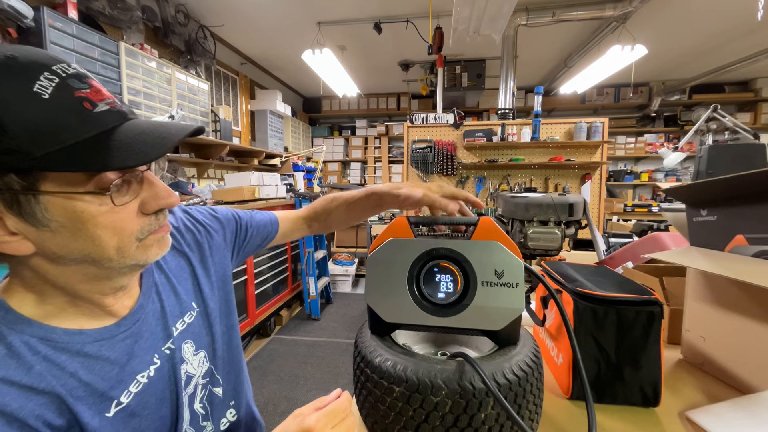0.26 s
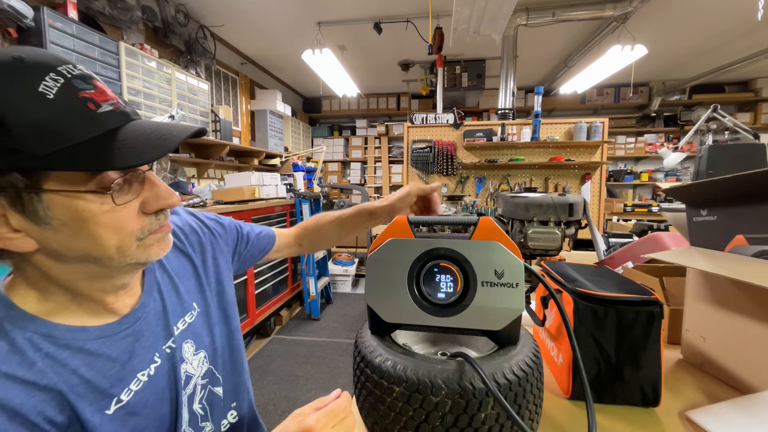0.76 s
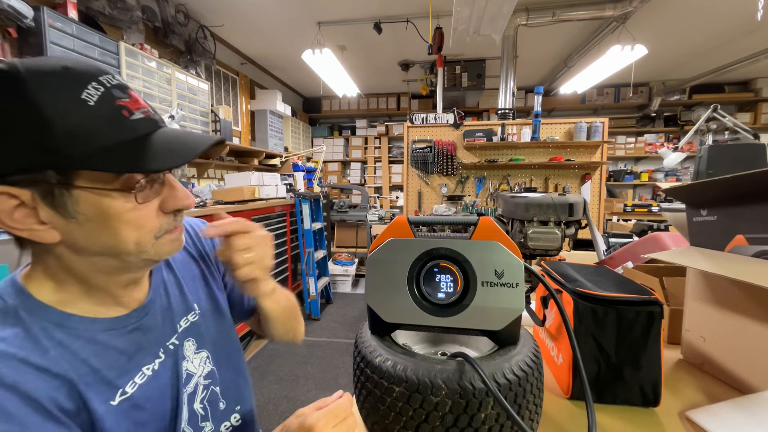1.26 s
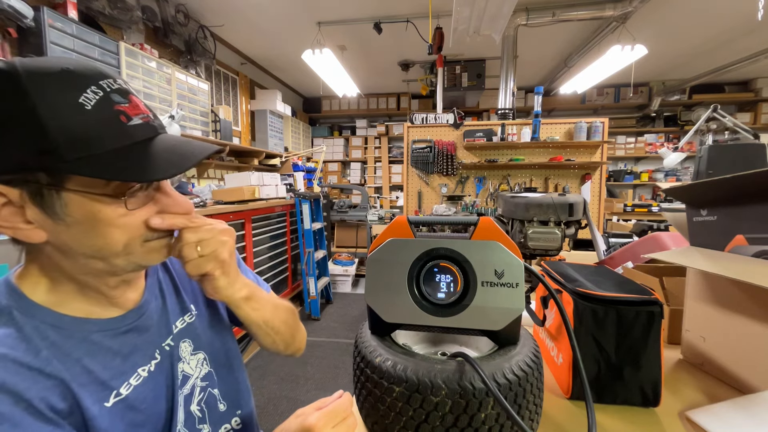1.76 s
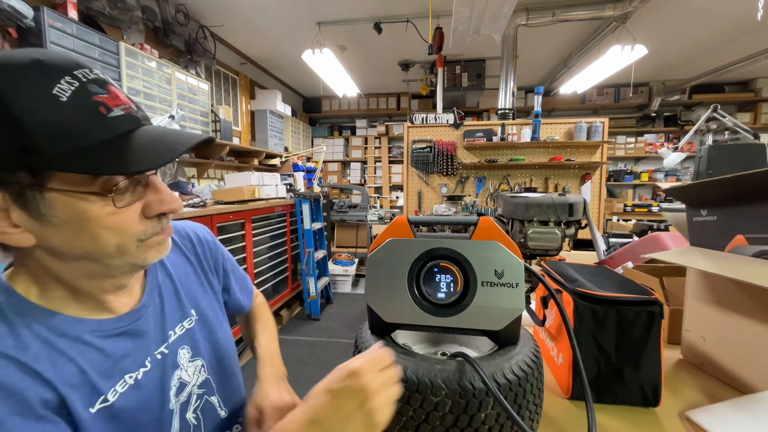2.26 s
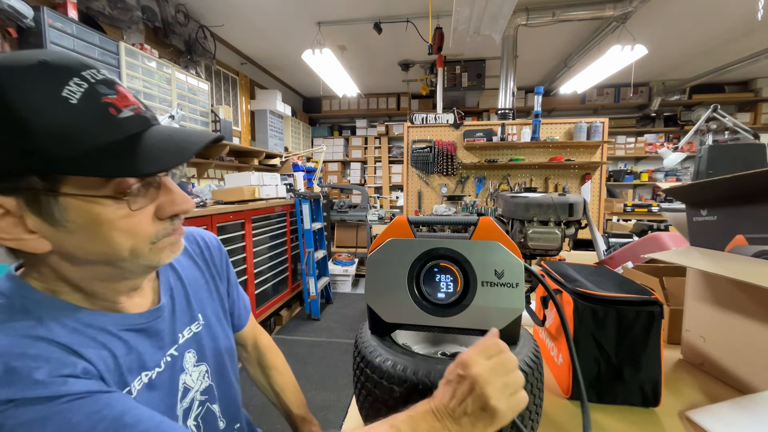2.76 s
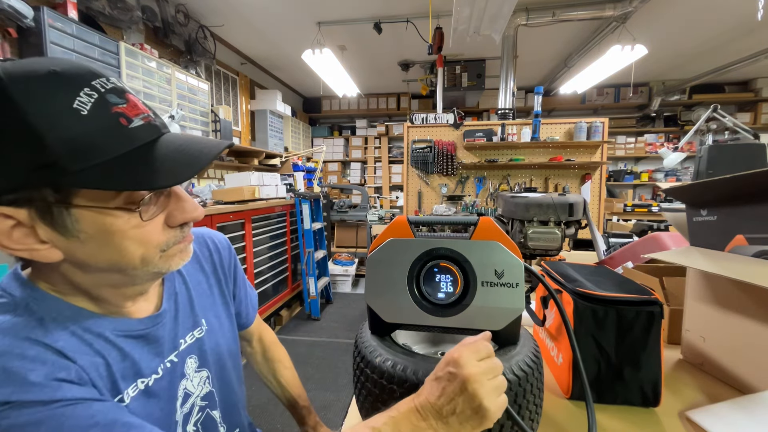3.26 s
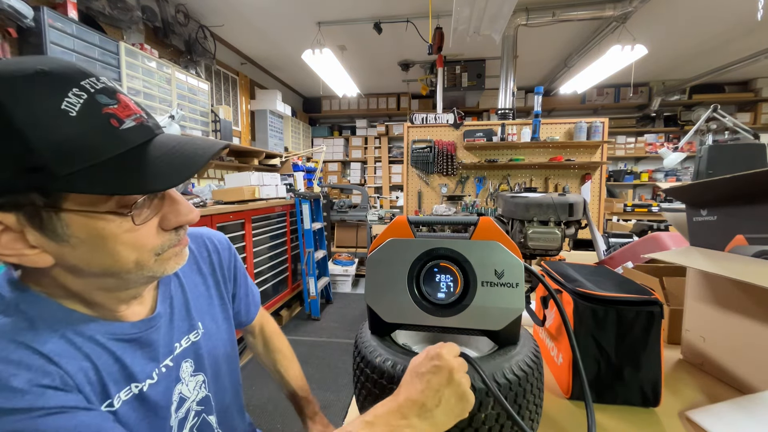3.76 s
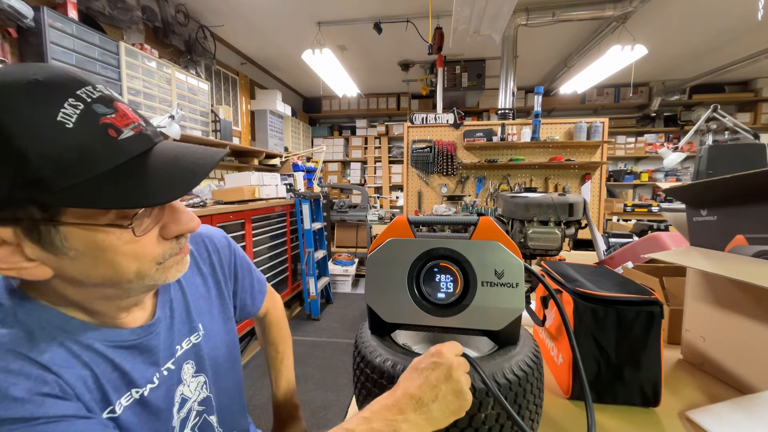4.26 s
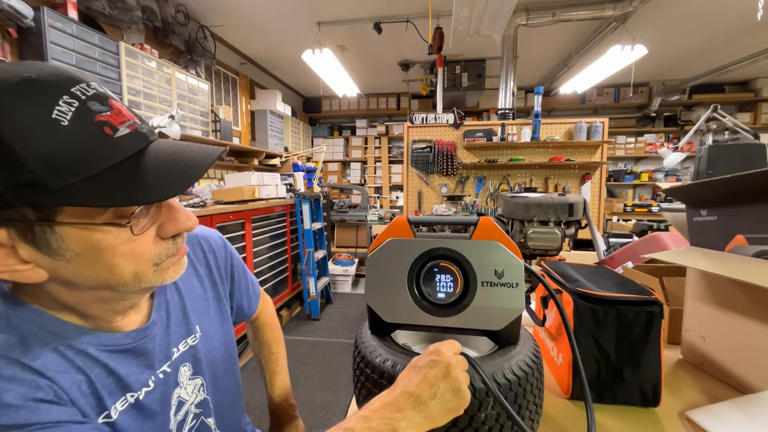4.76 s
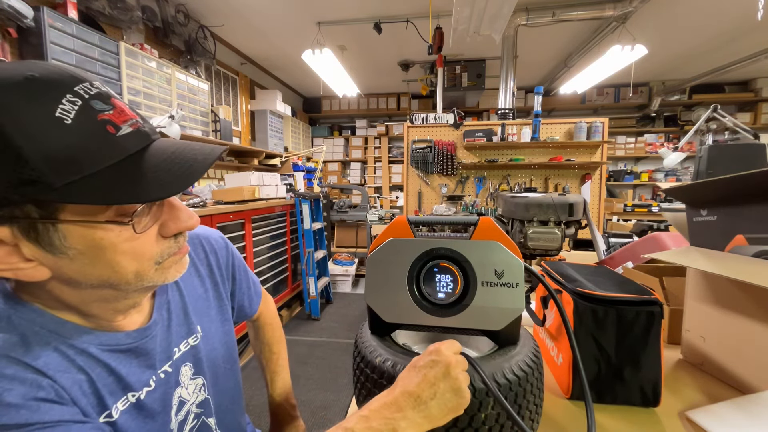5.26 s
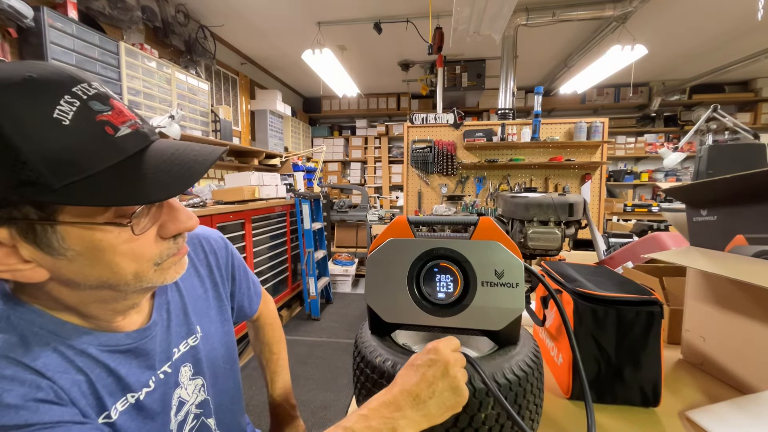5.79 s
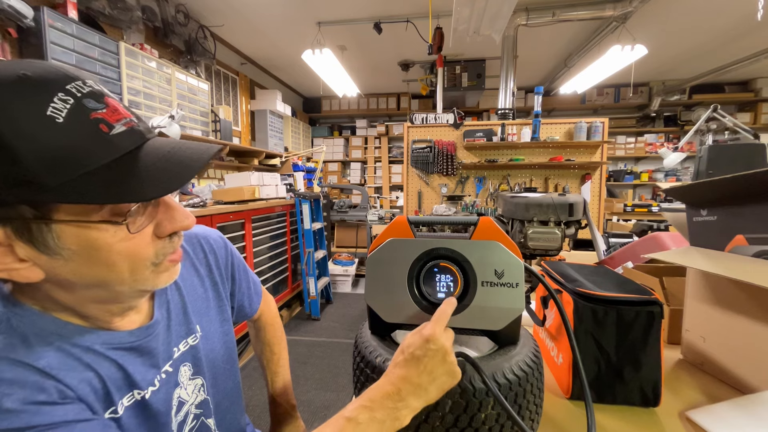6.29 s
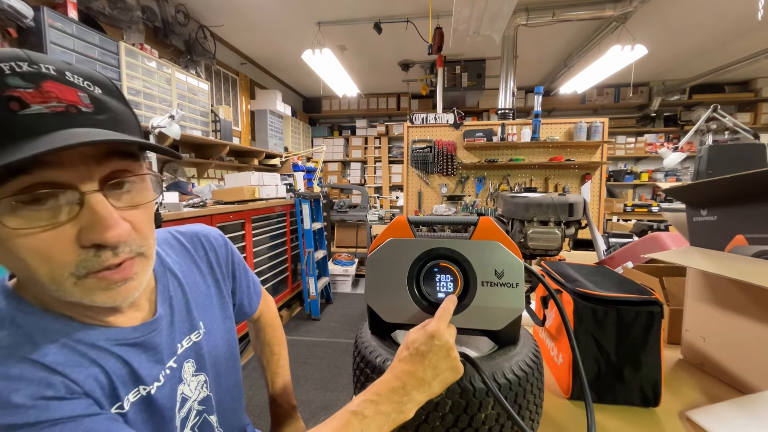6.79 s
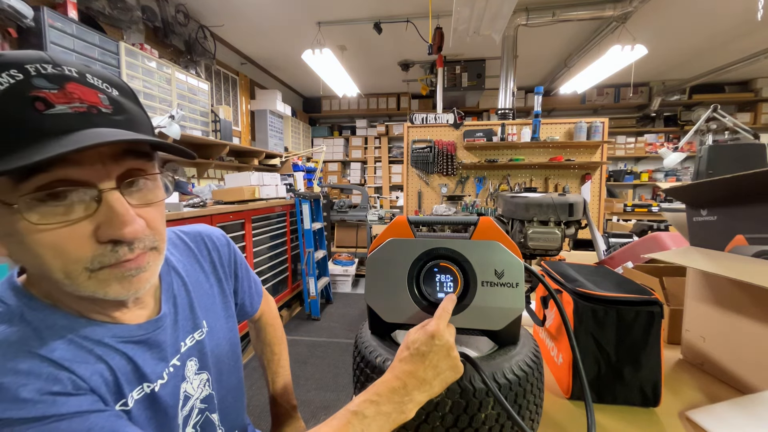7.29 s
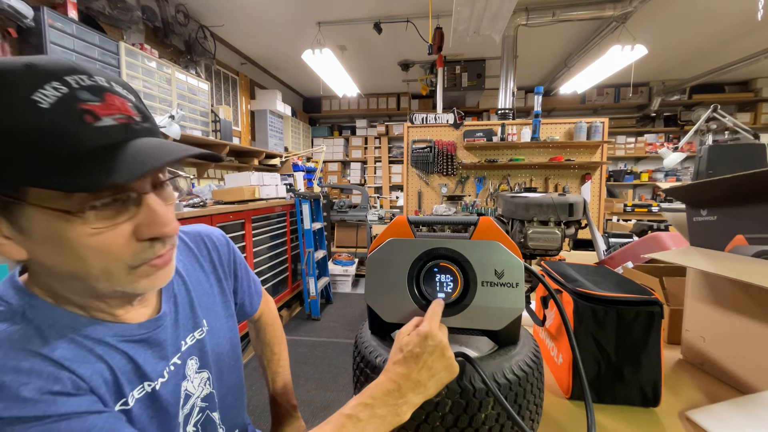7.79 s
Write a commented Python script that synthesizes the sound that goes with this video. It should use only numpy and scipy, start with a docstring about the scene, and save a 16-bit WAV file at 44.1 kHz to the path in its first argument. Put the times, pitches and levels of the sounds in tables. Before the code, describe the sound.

A cordless tire inflator is already running at the start and keeps going for about eight seconds, pumping up a tire on a workshop bench. Its piston gives a steady pitched hum with knocks so fast they blur into a buzz. Over this come a high gear whine, a rapid mechanical rattle, rushing air and a thin valve hiss. At first the pitch wavers very slightly and the gears rub with a light rasp, which eases at about 2.6 seconds. As pressure builds, the speed settles, the hum softens a little and the whine gains a tone an octave higher. The rasp returns at about 6.3 seconds, and the low hum dips for an instant at 7.7 seconds. Ceiling lights hum very faintly underneath. A single nearby microphone catches the pump with short reflections from the walls.

```python
"""A cordless tire inflator on a workshop bench, one microphone within earshot of pump and walls.
From the start its motor turns a crank through an 11-to-40 gear: the piston hums and knocks, the teeth
whine and rub, the rod rattles, air rushes and hisses through the valves twice a turn, and the lights
hum faintly. At 2.6 s the rubbing stops. As pressure builds, the speed settles, the hum softens and the
whine gains its octave. At 6.3 s the teeth rub again; at 7.7 s the low hum dips briefly."""
import sys
import numpy as np
from scipy import signal
from scipy.fft import rfft, irfft, next_fast_len
from scipy.io import wavfile
from scipy.ndimage import map_coordinates

SR = 44100
rng = np.random.default_rng(int(sys.argv[2]) if len(sys.argv) > 2 else 0)


def wav_out(sig):
    """Save sig, one row per channel (or a flat mono array), as 16-bit PCM at SR to the path in sys.argv[1]."""
    wavfile.write(sys.argv[1], SR, np.round(np.clip(np.atleast_2d(sig).T, -1, 1) * 32767).astype(np.int16))


N = 354563

# crank speed, hunting at first and then settling: time_s, speed_hz
CRANK_SPEED = [(0.06, 74.28), (0.3, 74.88), (0.42, 73.8), (0.66, 74.6), (0.9, 73.44), (1.47, 72.97),
               (1.68, 73.8), (2.13, 73.09), (2.22, 74.25), (2.46, 73.59), (3.15, 73.26), (3.24, 74.2),
               (3.3, 73.25), (4.86, 73.62), (5.01, 73.23), (5.07, 73.65), (7.8, 73.75), (7.98, 73.54)]
# piston tones: crank_multiple, level_db (relative)
PISTON_TONES = [(1, -38.5), (2, -11), (3, -29), (4, -1.53), (5, -5.5), (6, -20), (8, -12), (9, -9),
                (10, -10), (12, -1.9), (13, -8), (14, -9), (15, -12), (16, -18), (17, -21.5), (18, -10),
                (19, -8.5), (20, -16), (21, -14), (23, -36), (24, -17.5), (27, -25), (28, -17.5), (29, -28),
                (32, -29)]
# motor tones: motor_multiple, level_db
MOTOR_TONES = [(2, -59), (3, -30), (4, -40.5), (6, -42.5), (7, -46.5), (9, -65), (12, -44)]
# colour of the pumped air: frequency_hz, level_db (relative)
AIR_COLOUR = [(30, -55), (140, -27), (196, -29.5), (270, -10.5), (400, -11.5), (480, -24), (675, -4.5),
              (772, -9.5), (950, 0), (1160, -8), (1330, -4.5), (1480, -11), (1600, -5.5), (2300, -31)]
# tooth tone with the side tones of an uneven wheel: crank_multiple, level_db (relative)
TOOTH_TONES = [(38, -15), (39, -14.5), (40, 1), (41, -13), (45, -11), (47, -11.5)]
# tones around the tooth tone's octave: crank_multiple, level_db (relative)
OCTAVE_TONES = [(78, -22), (79, -5), (80, -10), (81, -16)]
# rise and fall of the gear whine: time_s, gain_db
WHINE_GAIN = [(0, -35.5), (.46, -34), (.65, -38), (.9, -29), (1.3, -32.5), (1.83, -31), (2.12, -36),
              (2.35, -28.5), (2.52, -34), (2.8, -32.5), (4.05, -34.5), (4.38, -30.5), (4.95, -32),
              (5.17, -29.5), (5.5, -31), (6.3, -30.5), (6.9, -36), (7.4, -32)]
# colour of the sliding teeth: frequency_hz, level_db (relative)
RASP_COLOUR = [(3200, -46), (3550, 5), (3760, 8.5), (4000, -5), (4500, -26)]
# spells in which the teeth rub: start_s, end_s
RUB_SPELLS = [(-.3, 2.6), (6.27, 8.3)]
# colour of the rattling rod and gears: frequency_hz, level_db (relative)
CLATTER_COLOUR = [(1000, -34), (1750, -3.5), (1950, -4.5), (2400, 3.5), (2620, -2.5), (2900, 0), (3150, -2),
                  (3550, -9), (4150, -8.5), (4600, -10.5), (6200, -14.5), (7300, -9), (8400, -14),
                  (9800, -18.5), (12000, -45)]
# colour of the valve hiss: frequency_hz, level_db (relative)
HISS_COLOUR = [(8500, -46), (10200, -18), (10620, -5), (10880, -4.5), (11300, -3), (12000, -1.5),
               (12450, 1.5), (12950, -13), (13550, -3), (14300, -3.5), (15100, -1.5), (15700, -9),
               (17000, -30)]
# narrow resonances of the housing and metal parts: pitch_hz, width_hz, lift_db
HOUSING_RINGS = [(1410, 120, 5), (3317, 48, 10), (3420, 40, 13), (4610, 75, 6.5), (4820, 110, 7.5),
                 (5090, 360, 3.5), (5894, 250, 7), (6580, 210, 4), (8440, 100, 7), (10940, 60, 6),
                 (11710, 69, 7.5), (14400, 120, 5)]
# reverberation of the workshop: frequency_hz, t60_s
SHOP_DECAY = [(200, 0.16), (2000, 0.35), (12000, 0.22)]

PINION_TEETH, WHEEL_TEETH, RATED_HZ = 11, 40, 73.6
FILL_S = 3.85  # time constant of the pressure rising in hose and tire
RECOVER_S = 0.77  # time constant with which the sound recovers after a rubbing spell


def amp(db):
    """Decibels to gain."""
    return 10 ** (np.asarray(db) / 20)


def unit(x):
    """Scale to rms 1."""
    return x / np.sqrt(np.mean(x ** 2) + 1e-20)


def along(points, hz):
    """Read (frequency_hz, value) points on a log axis."""
    frequencies, values = np.transpose(points)
    return np.interp(np.log(hz + 1), np.log(frequencies + 1), values)


def curve(points):
    """Join (time_s, value) points into one value per sample."""
    return np.interp(np.arange(N) / SR, *np.transpose(points))


def wobble(rate_hz):
    """A smooth random curve with rate_hz knots a second."""
    coarse = np.arange(0, N + 64, 64)
    knots = rng.standard_normal(4096)
    smooth = map_coordinates(knots, [coarse * rate_hz / SR], mode="wrap")
    return np.interp(np.arange(N), coarse, smooth)


def spell(start_s, end_s, fade_s):
    """1 from start to end and 0 outside, with soft edges."""
    t = np.arange(N) / SR
    return np.clip(np.minimum(t - start_s, end_s - t) / fade_s + .5, 0, 1)


def filtered(x, response):
    """Shape x by a gain that depends on frequency."""
    size = next_fast_len(N + SR // 2)
    return irfft(rfft(x, size) * response(np.fft.rfftfreq(size, 1 / SR)), size)[:N]


def housing(x, colour):
    """Give x a colour and the housing's resonances, at rms 1."""
    def lift_db(hz):
        return sum(db / (1 + (2 * (hz - pitch) / width) ** 2) for pitch, width, db in HOUSING_RINGS)
    return unit(filtered(x, lambda hz: amp(along(colour, hz) + lift_db(hz))))


def shop(x, wet_db):
    """The direct sound plus the room's diffuse answer, already built up around the running pump."""
    hz, t, spectrum = signal.stft(rng.standard_normal(SR // 3), SR, nperseg=256)
    decay = amp(-60 * t / along(SHOP_DECAY, hz)[:, None])
    tail = signal.istft(spectrum * decay, SR, nperseg=256)[1]
    return x + amp(wet_db) * irfft(rfft(x) * rfft(tail / np.linalg.norm(tail), N), N)


def tones(turns, partials, drift_db, flutter_rad):
    """Sines on whole multiples of a shaft's speed; higher ones drift and flutter more."""
    out = np.zeros(N)
    for order, db in partials:
        phase = 2 * np.pi * (order * turns + rng.random())
        phase += flutter_rad * np.sqrt(order) * wobble(30)
        out += amp(db + drift_db * np.sqrt(order) * wobble(1.84)) * np.sqrt(2) * np.sin(phase)
    return out


def drive_hum(turns, piston_db):
    """The piston hums on multiples of the crank speed, the motor on those of its faster shaft."""
    piston = amp(piston_db) * tones(turns, PISTON_TONES, drift_db=0.08, flutter_rad=0.012)
    motor = tones(turns * WHEEL_TEETH / PINION_TEETH, MOTOR_TONES, drift_db=-0.04, flutter_rad=0.041)
    return piston + motor


def puffs(turns, stroke_db, valve_db, scatter_db):
    """Noise that swells once a turn with the stroke and twice with the valves, never twice alike."""
    angle = 2 * np.pi * turns
    swell_db = stroke_db * np.cos(angle) + valve_db * np.cos(2 * angle) + scatter_db * wobble(150)
    return amp(swell_db) * rng.standard_normal(N)


def knocks(turns, sway, scatter_db=1, jitter_s=.00005, count=1400):
    """The piston knocks at each reversal, harder or softer with the motor's angle."""
    reversals = np.arange(1, count + 1) / 2
    timing, strength = rng.standard_normal((count, 2)).T
    at = np.interp(reversals, turns, np.arange(N), right=2 * N) + jitter_s * SR * timing
    motor_angle = 2 * np.pi * reversals * WHEEL_TEETH / PINION_TEETH
    force = (1 + sway * np.cos(motor_angle)) * amp(scatter_db * strength)
    force[::2] *= .35  # the intake stroke ends more softly
    return unit(np.bincount(np.clip(at, 0, N).astype(int), force, N + 1)[:N])


def pumped_air(turns, level_db):
    """Pumped air and piston knocks boom in the plastic case."""
    rush = unit(puffs(turns, stroke_db=.8, valve_db=3.5, scatter_db=0.3))
    thumps = unit(shop(knocks(turns, sway=.7), wet_db=5))
    return amp(level_db) * housing(shop(rush, wet_db=-7.5) + 0.37 * thumps, AIR_COLOUR)


def nasal_ring(x, lift_db, pitch_hz=1440, width_hz=61):
    """The case's nasal ring swells and relaxes in one narrow band."""
    ring = filtered(x, lambda hz: np.exp(-((hz - pitch_hz) / width_hz) ** 2))
    return x + (amp(lift_db) - 1) * ring


def gear_teeth(turns, octave_db, rasp_db):
    """The teeth whine as they meet, harder on the compression stroke, and rasp as they slide."""
    bite_db = 3.8 * np.cos(2 * np.pi * turns) + .7 * wobble(90) + .3 * wobble(3.4)
    whine = amp(curve(WHINE_GAIN) + bite_db) * tones(turns, TOOTH_TONES, drift_db=0.13, flutter_rad=0.092)
    octave_gain = amp(octave_db + 1.4 * wobble(6.8))
    octave = octave_gain * tones(turns, OCTAVE_TONES, drift_db=0.13, flutter_rad=0.047)
    slide = puffs(turns, stroke_db=-1.5, valve_db=-2.0, scatter_db=1.5)
    rasp = amp(rasp_db + 0.53 * wobble(6)) * housing(slide, RASP_COLOUR)
    return whine + octave + rasp


def rod_clatter(turns, level_db):
    """Rod and gears rattle with every turn, a little after the stroke."""
    rattle = unit(puffs(turns - .22, stroke_db=2.0, valve_db=1.8, scatter_db=1.5))
    ticks = unit(shop(knocks(turns, sway=0.26), wet_db=6))  # reach the microphone mostly by reflection
    return amp(level_db) * housing(shop(rattle, wet_db=-4.0) + 0.37 * ticks, CLATTER_COLOUR)


def valve_hiss(turns, level_db):
    """Air squeezes past the valve reeds twice a turn."""
    jet = puffs(turns - .1, stroke_db=0.5, valve_db=3.0, scatter_db=1.5)
    return amp(level_db + .25 * wobble(20)) * housing(shop(jet, wet_db=1), HISS_COLOUR)


def ceiling_lights(pitch_hz, level_db):
    """Mains hum from the lamps overhead."""
    return amp(level_db) * np.sqrt(2) * np.sin(2 * np.pi * pitch_hz * np.arange(N) / SR)


def low_dip(x, start_s, length_s, gain_db, below_hz):
    """The low hum drops away for a moment."""
    low = filtered(x, lambda hz: 1 / (1 + (hz / below_hz) ** 4))
    return x + (amp(gain_db) - 1) * spell(start_s, start_s + length_s, fade_s=.012) * low


def scene():
    """At the bench: one crank angle times the whole pump, and rising pressure shifts the balance."""
    t = np.arange(N) / SR
    speed_hz = curve(CRANK_SPEED)
    turns = np.cumsum(speed_hz) / SR
    pressure = 1 - np.exp(-t / FILL_S)  # 0 with no back pressure, 1 when full
    rubbing = sum(spell(start, end, fade_s=.2) for start, end in RUB_SPELLS)
    # after a spell the air swells while rattle and octave soften, then all recover
    near_end = sum((t > start) * np.exp(-np.abs(t - end) / RECOVER_S) for start, end in RUB_SPELLS)
    eased = (1 - rubbing) * near_end
    air_db = -25 - 0.96 * pressure + 2 * eased + 0.21 * wobble(3.08)
    hum = drive_hum(turns, piston_db=-26 - 1.5 * pressure)
    air = pumped_air(turns, air_db)
    body = nasal_ring(hum + air, lift_db=1 + 1.9 * (speed_hz - RATED_HZ) - 2 * pressure)
    gears = gear_teeth(turns, octave_db=-50.5 + 14 * pressure - 10 * eased, rasp_db=-37.5 + 4.5 * rubbing)
    clatter = rod_clatter(turns, level_db=-23.87 - 2.5 * pressure - 1.3 * eased)
    hiss = valve_hiss(turns, level_db=-32 - 1.5 * pressure)
    lights = ceiling_lights(pitch_hz=120, level_db=-54.5)
    mix = body + gears + clatter + hiss + lights
    return low_dip(mix, start_s=7.728, length_s=0.046, gain_db=-16, below_hz=330)[None]


def record(dry):
    """The mono microphone channel passes nothing above its band limit."""
    top_hz = 15740
    return np.array([filtered(channel, lambda hz: hz < top_hz) for channel in dry])


dry = scene()
out = record(dry)
wav_out(out)
```